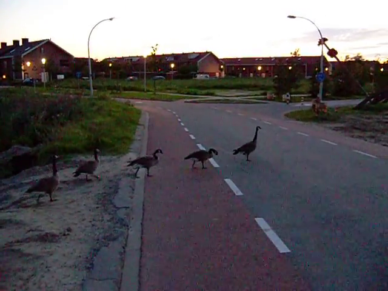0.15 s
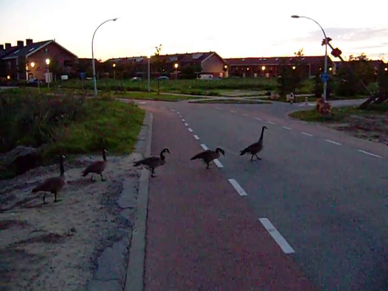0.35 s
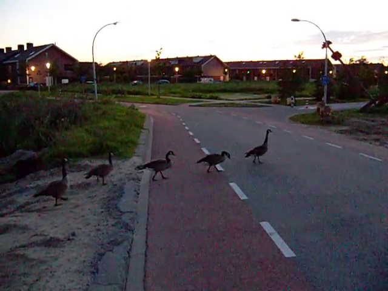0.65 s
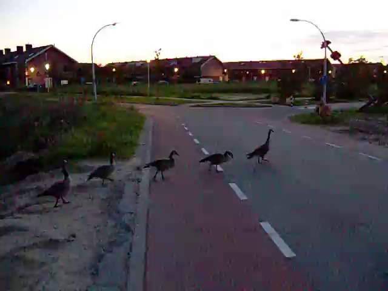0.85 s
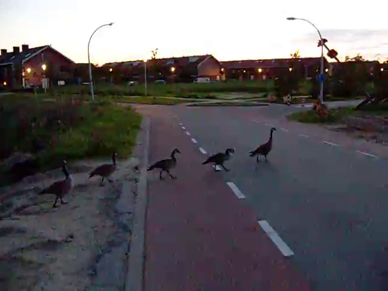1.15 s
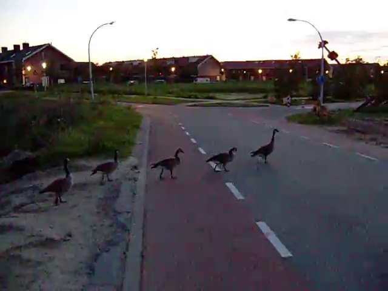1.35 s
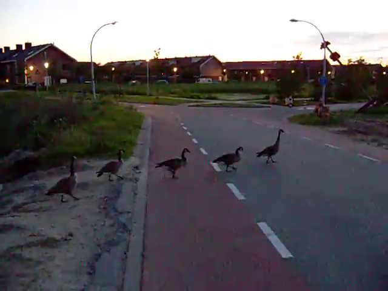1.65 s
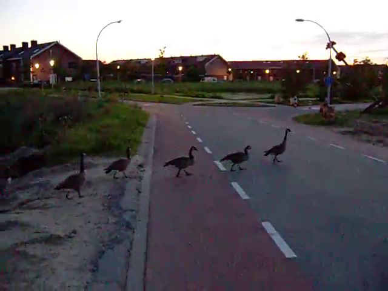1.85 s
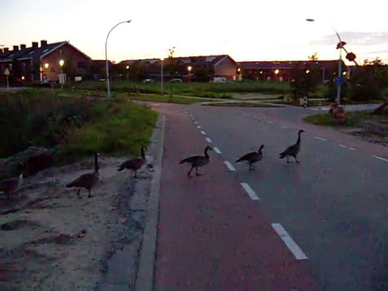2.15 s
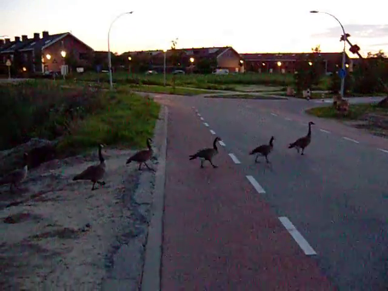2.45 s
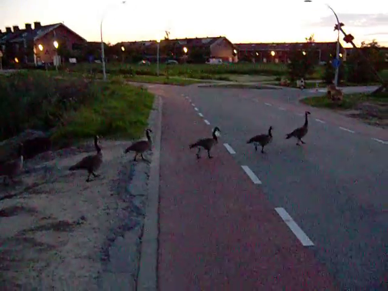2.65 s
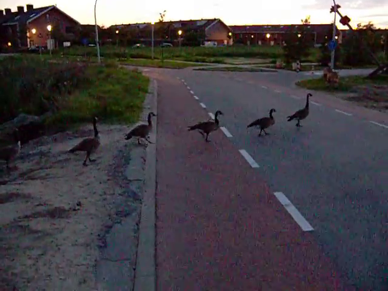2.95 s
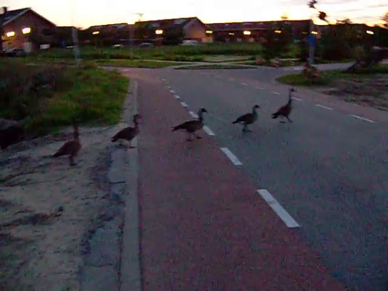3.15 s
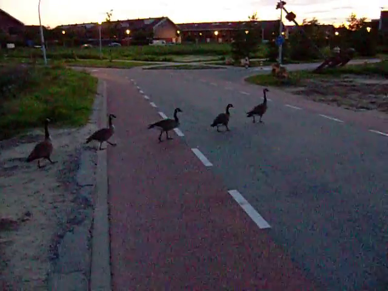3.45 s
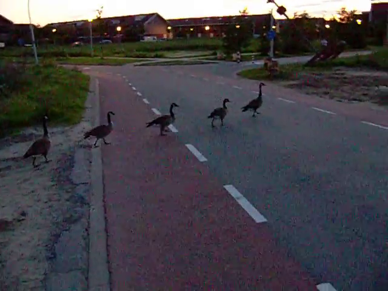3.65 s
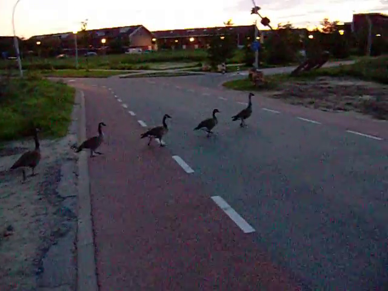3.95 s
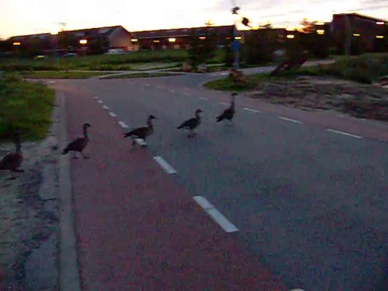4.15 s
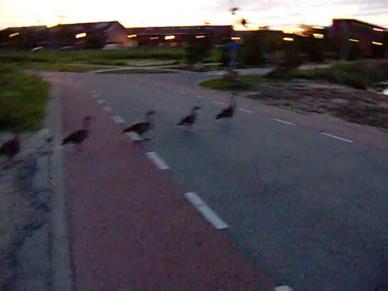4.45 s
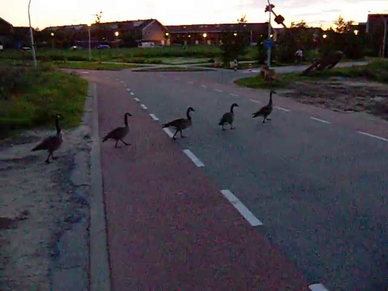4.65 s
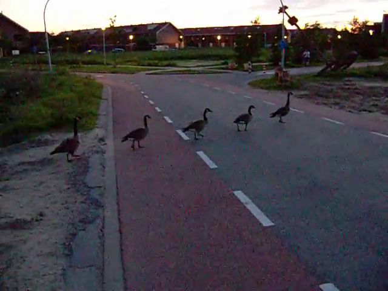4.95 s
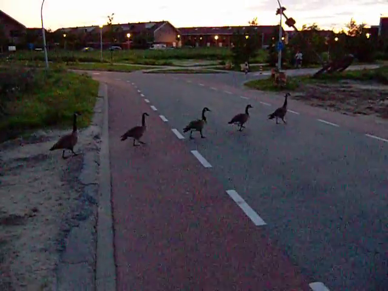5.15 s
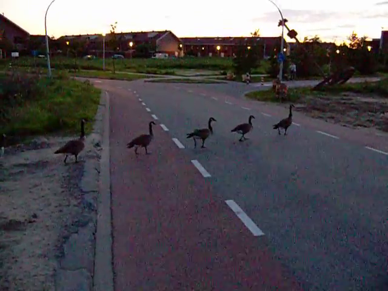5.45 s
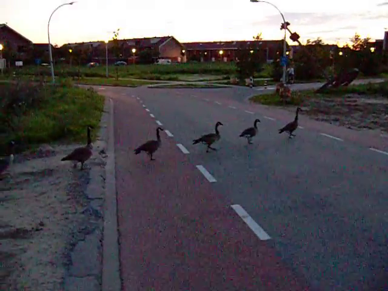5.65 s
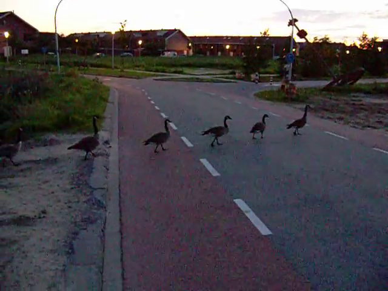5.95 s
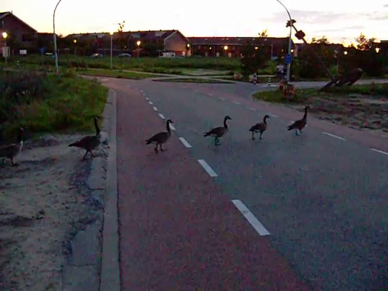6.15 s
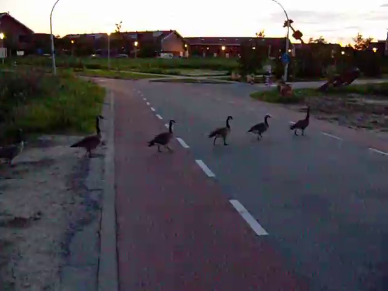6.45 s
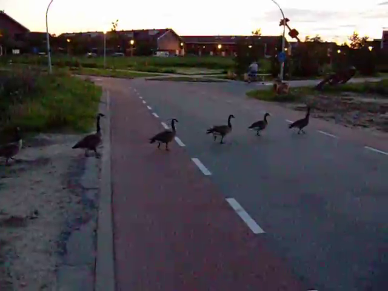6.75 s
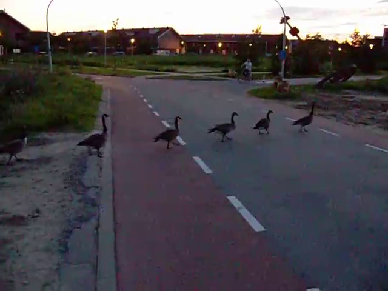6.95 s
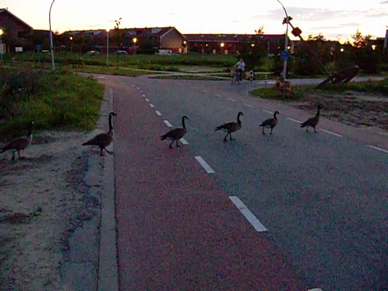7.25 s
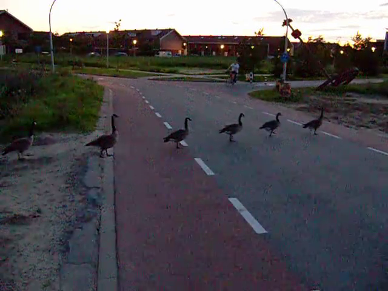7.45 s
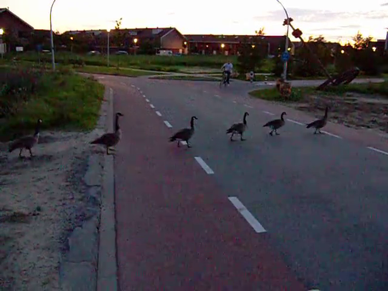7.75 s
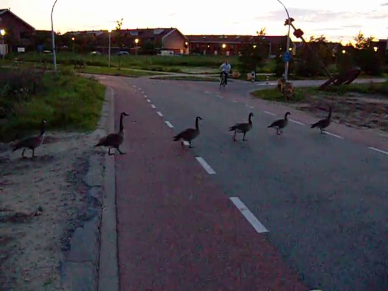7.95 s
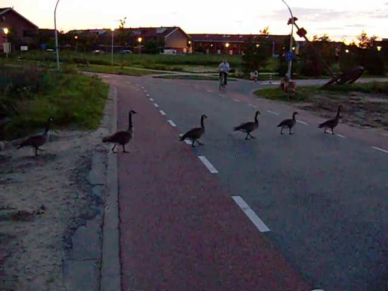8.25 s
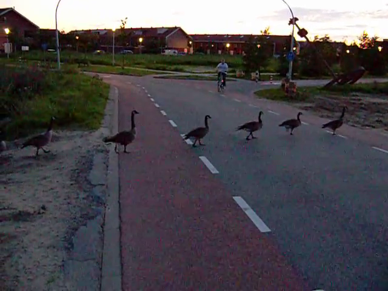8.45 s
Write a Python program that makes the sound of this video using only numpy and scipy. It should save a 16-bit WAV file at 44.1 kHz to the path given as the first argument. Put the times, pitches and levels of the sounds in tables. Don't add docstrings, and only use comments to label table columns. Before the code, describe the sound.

Geese cross a street in the open air, and one calls four times: clipped, clean, piercing yelps with lots of quiet between them. Faint slaps of echo come back from nearby houses. Far traffic makes a constant soft rumble and hush, joined at first by a low engine drone that dies off. Close to the small hand-held microphone are dull finger bumps, mostly mid-way, bright little ticks, slight rustling and a barely audible whine.

```python
import sys
import numpy as np
from scipy import signal
from scipy.fft import rfft, irfft
from scipy.io import wavfile
from scipy.ndimage import uniform_filter1d

SR = 44100
rng = np.random.default_rng(int(sys.argv[2]) if len(sys.argv) > 2 else 0)


def generate_wav(sig):
    pcm = np.round(np.clip(np.atleast_2d(sig).T, -1, 1) * 32767).astype(np.int16)
    wavfile.write(sys.argv[1], SR, pcm)


def magnitude_from_level(level_db):
    exponent = np.asarray(level_db, float) / 20
    return 10 ** exponent


N = 378819


def rms_one(x):
    return x / np.sqrt(np.mean(x ** 2) + 1e-20)


def in_time(rows, t):
    s, *columns = np.transpose(rows)
    return [np.interp(t, s, column) for column in columns]


def at_hz(points, hz):
    point_hz, db = np.array(points).T
    return np.interp(np.log(hz), np.log(point_hz), db)


def drift(rate):
    r = np.exp(-40 * np.pi * rate / SR)
    slow = signal.lfilter([1], [1, -2 * r, r * r], rng.standard_normal(N // 20 + 4002))
    slow = slow[4000:]
    return np.interp(np.arange(N) / 20, np.arange(len(slow)), rms_one(slow))


def resonance(x, hz, width_hz):
    r = np.exp(-np.pi * width_hz / SR)
    poles = [1, -2 * r * np.cos(2 * np.pi * hz / SR), r * r]
    return signal.lfilter([(1 - r * r) / 2, 0, (r * r - 1) / 2], poles, x)


def low_pass(x, order, hz):
    return signal.sosfilt(signal.butter(order, hz, fs=SR, output="sos"), x)


def add(out, s, sound):
    i = round(s * SR)
    out[i:i + len(sound)] += sound


def swells(rows, floor_db, t):
    peaks = [db - 10 * np.where(t < s, (s - t) / rise, (t - s) / fall) for s, db, rise, fall in rows]
    return magnitude_from_level(np.maximum(np.max(peaks, axis=0), floor_db))


# [start t/s, onset f/Hz, top f/Hz, tail f/Hz, share of the fall done at the shoulder]
CALLS = [
    (2.0419, 1590, 1628, 1395, .72),
    (3.6438, 1632, 1725, 1440, .5),
    (5.948, 1650, 1764, 1505, .27),
    (7.8162, 1632, 1768, 1503, 0.47),
]
# [strength level/dB, top level/dB, fall level/dB, voice breaks after t/s, length t/s]
MANNER = [
    (0.5, -4, -9, .0445, 0.055),
    (0, 2, -4, .0445, 0.058),
    (-0.5, -0.5, -7, 0.04, 0.055),
    (-2.5, 3, 6, .042, 0.057),
]
# [half-pitch lines at onset level/dB, beak level/dB, throb level/dB, catch at the fall level/dB]
COLOUR = [
    (-4.5, 6, -2.5, -2),
    (-13, 3.5, -3, -10),
    (-12, 4.5, 0, -6),
    (-11, 11.5, -0.5, -3.5),
]
# [f/Hz, rms of a line level/dB]
THROAT = [(800, -61.5), (1650, -36.5), (2500, -41), (3300, -40.5), (4200, -47), (4800, -36.5),
          (5150, -35.5), (5900, -33.5), (6700, -33), (7300, -28.5), (7700, -35), (8100, -35.5)]
# [f/Hz, dB per dB of effort]
EFFORT_SLOPE = [(800, -0.4), (1650, 0.11), (3300, 0), (5000, 0.76), (6700, 0.57)]
# [f/Hz, dB per dB of catch]
CATCH_SLOPE = [(1650, .5), (3300, .9), (6700, 1.1)]
BEAK_HZ, BEAK_WIDTH_HZ, BEAK_CLICK_DB = 3140, 300, -31
WEAK_DB = -27.5
PITCH_WOBBLE, LINE_WOBBLE_DB, BREATH_DB = .004, 0.4, -21


def bird():
    out, wobble = np.zeros(N), drift(170)
    for call, manner, colour in zip(CALLS, MANNER, COLOUR):
        start, end = call[0], call[0] + manner[-1]
        at = np.arange(round(start * SR), round(end * SR))
        t = at / SR
        pitch, effort, half_db, beak_db, catch_db = call_controls(t, call, manner, colour)
        soft_db = np.minimum(effort - WEAK_DB, 0)
        half_phase = np.pi * np.cumsum(pitch * (1 + PITCH_WOBBLE * wobble[at])) / SR
        edges = np.clip(np.minimum((t - start) / 0.0019, (end - t) / 0.0094), 0, 1)
        for k in range(1, 11):
            hz = k * pitch / 2
            line_db = at_hz(THROAT, hz) + at_hz(EFFORT_SLOPE, hz) * effort
            line_db += (k % 2) * half_db
            line_db += soft_db * (hz > 4000) + at_hz(CATCH_SLOPE, hz) * catch_db
            line_db += beak_db * np.exp(-((hz - BEAK_HZ) / BEAK_WIDTH_HZ) ** 2)
            line_db += LINE_WOBBLE_DB * wobble[at - 1500 * k]
            breath = rms_one(uniform_filter1d(rng.standard_normal(len(t)), size=24))
            level = edges * (1 + magnitude_from_level(BREATH_DB) * breath) * np.sqrt(2) * magnitude_from_level(line_db)
            out[at] += level * np.cos(k * half_phase) * (hz < 8400)
        click = np.diff(rng.standard_normal(201)) * np.exp(-np.arange(200) / 60)
        add(out, start - .001, magnitude_from_level(BEAK_CLICK_DB) * click)
    return out


STAGE_EFFORT = [-13.5, 5, -3.5, -3, -14, -24.5, -42.5, -44]
STAGE_HALF = [-13, -33.5, -35, -30, -27, -25, -22]
# [t/s, length t/s, half-pitch lines level/dB]
DOUBLING = [
    (5.978, 0.0093, 2),
    (5.985, 0.0046, 4.5),
    (6.003, .008, 5),
    (7.87, 0.0089, -5),
]
BURST_S, SETTLED_S, TOP_S, FALLING_S, SHOULDER_S = .003, 0.012, 0.022, .030, 0.0383
ONSET_SHARP, SETTLED_SHARE, FALLING_SHARE, TAIL_SAG = 0.043, .6, 0.28, .005
BEAK_OPENING, BEAK_CLOSED_DB = 0.97, -7.5
FIRST_CATCH_S, FIRST_CATCH_DB, THROB_S, BREAK_CATCH_DB = .0075, -16, .0066, -10
THROB_SAG, THROB_SAG_S = .012, .0028


def call_controls(t, call, manner, colour):
    start, onset, top, tail, shoulder = call
    strength_db, top_db, fall_db, break_s, length = manner
    onset_half_db, beak_db, throb_db, catch_db = colour
    stages = start + np.array([0, BURST_S, SETTLED_S, TOP_S, FALLING_S, SHOULDER_S, break_s, length])
    settled, drop = onset + SETTLED_SHARE * (top - onset), top - tail
    pitch = [onset * (1 + ONSET_SHARP), onset, settled, top,
             top - FALLING_SHARE * drop, top - shoulder * drop, tail, tail * (1 - TAIL_SAG)]
    sag_at = start + FIRST_CATCH_S + 1.6 * THROB_S
    sag = 1 - THROB_SAG * np.exp(-((t - sag_at) / THROB_SAG_S) ** 2)
    held = [0, 0, 0, top_db, (top_db + fall_db) / 2, fall_db, 0, 0]
    effort = strength_db + np.array(STAGE_EFFORT) + held
    half_db = np.interp(t, stages, [STAGE_HALF[0], onset_half_db, *STAGE_HALF[1:]])
    for s, spread, db in DOUBLING:
        half_db = np.maximum(half_db, db - 10 * ((t - s) / spread) ** 2)
    beak = [0, 0, BEAK_OPENING * beak_db, beak_db] + [BEAK_CLOSED_DB] * 4
    catches = [(FIRST_CATCH_S, FIRST_CATCH_DB),
               (FIRST_CATCH_S + THROB_S, throb_db), (FIRST_CATCH_S + 2 * THROB_S, throb_db),
               (FALLING_S, catch_db), (break_s, BREAK_CATCH_DB)]
    caught_db = sum(catch(t - start - s, db) for s, db in catches)
    return (sag * np.interp(t, stages, pitch), np.interp(t, stages, effort), half_db,
            np.interp(t, stages, beak), caught_db)


def catch(t, db):
    closing_s, opening_s, overshoot, settling_s = 0.0017, 0.0011, 0.33, 0.0046
    dip = np.exp(-(t / np.where(t < 0, closing_s, opening_s)) ** 2)
    return db * (dip - overshoot * (1 - dip) * (t > 0) * np.exp(-np.abs(t) / settling_s))


# [delay t/s, level/dB]
ECHOES = [
    (.024, -23),
    (.045, -23),
    (.088, -15),
    (.118, -25),
    (.15, -26),
    (.19, -29),
]
# [f/Hz, width f/Hz, level/dB]
WALLS = [
    (1700, 400, -10),
    (3450, 240, 0),
    (5150, 400, -10),
    (6900, 600, -24),
]
TAIL_DB, TAIL_START_S, TAIL_T60_S = -46, 0.012, .55


def house_fronts(x):
    t = np.arange(SR // 3) / SR
    paths = rng.standard_normal(len(t)) * (t > TAIL_START_S) * magnitude_from_level(TAIL_DB - 60 * t / TAIL_T60_S)
    for delay, db in ECHOES:
        paths[round(delay * SR)] += magnitude_from_level(db)
    late = signal.fftconvolve(x, paths)[:N]
    return sum(magnitude_from_level(db) * resonance(late, hz, width) for hz, width, db in WALLS)


# [t/s, firing f/Hz, rms level/dB]
ENGINE = [
    (0.0, 119.5, -42),
    (0.3, 119.6, -40.5),
    (0.63, 121.5, -45.5),
    (0.8, 122.3, -48.5),
    (1.22, 120.1, -49),
    (2.3, 119.9, -56),
]
ORDER_DB = [0, -15, -12]
ORDER_FADE = [0, 23, 14]


def engine():
    t = np.arange(N) / SR
    hz, level_db = in_time(ENGINE, t)
    phase = 2 * np.pi * np.cumsum(hz) / SR
    gone = np.clip((2.5 - t) / 0.33, 0, 1)
    tones = 0
    for order, (db, fade) in enumerate(zip(ORDER_DB, ORDER_FADE), start=1):
        tones = tones + np.sqrt(2) * magnitude_from_level(level_db + db - fade * t) * np.sin(order * phase)
    return gone * tones


# [t/s, peak level/dB, f/Hz, time to fall 60 dB t/s, push -1 or 1]
KNOCKS = [(.40, -48, 1270, .12, 1), (2.229, -19.5, 1220, 0.0015, -1), (2.229, -28, 332, 0.015, 1),
          (3.7438, -38, 1070, 0.041, 1), (3.745, -36, 480, 0.032, -1), (3.759, -41.5, 1090, 0.097, 1),
          (3.952, -29, 254, 0.035, 1), (3.979, -34, 230, 0.037, 1), (4.2366, -28, 420, 0.014, -1),
          (4.2412, -28, 190, 0.032, -1), (4.4012, -24, 415, 0.0077, -1), (4.405, -45, 298, .03, -1),
          (4.412, -28, 300, 0.0068, -1)]
# [t/s, peak level/dB, centre f/Hz, width f/Hz]
TICKS = [
    (.7604, -43, 6000, 2500),
    (2.2278, -46, 7100, 1187),
    (2.6693, -40, 6500, 2500),
    (3.2387, -37.5, 2630, 1200),
    (4.993, -36, 6400, 3000),
    (5.19, -41, 5530, 3000),
    (5.2394, -40, 6800, 2000),
    (7.6505, -33, 5800, 5000),
    (8.0152, -45, 4000, 1200),
]
# [t/s, peak level/dB, rise by 10 dB t/s, fall by
# 10 dB t/s]
RUSTLE = [(0.0, -67, .01, .06), (.35, -61.5, .08, .8), (1.19, -66, .01, .2), (2.21, -58.5, 0.037, 0.011),
          (2.668, -63, .01, .06), (3.79, -58, .05, .06), (4.87, -65, .5, .08), (4.99, -58.5, .006, 0.1),
          (5.69, -59.5, .008, 0.23), (7.444, -64, .025, .2), (7.9, -64, .2, 0.18)]
RUSTLE_FLOOR_DB, CASE_CUT_HZ = -73, 2600
TICK_T60_S, CONTACT_CYCLES = 0.0071, 0.094


def camera():
    t = np.arange(N) / SR
    cloth = resonance(resonance(rng.standard_normal(N), 6700, 2400), 6700, 2400)
    out = swells(RUSTLE, RUSTLE_FLOOR_DB, t) * rms_one(cloth)
    short = t[:SR // 8]
    for s, db, hz, t60, push in KNOCKS:
        soft = (1 - np.exp(-short * hz / CONTACT_CYCLES)) ** 2
        knock = np.sign(push) * soft * magnitude_from_level(db - 60 * short / t60) * np.sin(2 * np.pi * hz * short)
        add(out, s, low_pass(knock, 2, CASE_CUT_HZ))
    for s, db, hz, width_hz in TICKS:
        burst = rng.standard_normal(len(short)) * magnitude_from_level(-60 * short / TICK_T60_S)
        burst = resonance(burst, hz, width_hz)
        add(out, s, magnitude_from_level(db) * burst / np.abs(burst).max())
    return out


# [multiple of the whine, level/dB, wavering level/dB]
WHINES = [(1, -69, 0), (2, -69, 1), (4, -81, 0.8), (5, -73.5, 2.5), (6, -78.5, 1.7), (7, -81, 0.3),
          (8, -71, 0.3)]
# [f/Hz, level/dB]
SIDE_WHINES = [(7852, -83), (7882, -81)]
# [t/s, peak level/dB, rise t/s, fall t/s]
WHISTLE = [
    (1.2, -67.5, .2, .6),
    (1.87, -66.5, 1.7, 1.2),
    (3.69, -66, .7, 1.2),
    (5.7, -71, 1.5, .2),
    (6.41, -69, 0.17, 1.1),
]
WHINE_HZ, WHISTLE_HZ, WHISTLE_DRIFT_HZ, WHISTLE_FLOOR_DB = 960.9, 2656, 3, -81


def whines():
    t = np.arange(N) / SR
    out = sum(magnitude_from_level(db + waver_db * drift(6)) * np.sin(2 * np.pi * round(k) * WHINE_HZ * t)
              for k, db, waver_db in WHINES)
    out += sum(magnitude_from_level(db) * np.sin(2 * np.pi * hz * t) for hz, db in SIDE_WHINES)
    level = swells(WHISTLE, WHISTLE_FLOOR_DB, t) * magnitude_from_level(1.1 * drift(9))
    hz = WHISTLE_HZ + WHISTLE_DRIFT_HZ * drift(1.5)
    return np.sqrt(2) * (out + level * np.sin(2 * np.pi * np.cumsum(hz) / SR))


# [t/s, level/dB]
HUSH = [(0.0, -47.5), (1.1, -46), (2.4, -44.5), (3.0, -46.5), (3.37, -42), (3.7, -46), (4.57, -45),
        (5.0, -44.5), (6.2, -46.5), (6.74, -45.5), (8.59, -49)]
# [f/Hz, level/dB]
RUMBLE = [(8.8, -46.5), (15, -9), (64, 1.5), (102, 1.5), (140, -11), (260, -14.5), (340, -24.5),
          (570, -120)]
# [f/Hz, level/dB]
HISS = [(88, -26), (150, 0), (216, -8.5), (362, -6), (414, -8), (983, -13), (1700, -17.5), (1980, -18),
        (2370, -20), (2580, -19.5), (3420, -21.5), (7480, -26.5), (8000, -28.5), (10400, -65.5),
        (17600, -120)]
HISS_DB, HISS_FOLLOWS, HISS_EARLY_DB, HISS_SETTLES_S = -50.5, .03, 2.5, 1.5


def street():
    t = np.arange(N) / SR
    rumble_db, = in_time(HUSH, t)
    hiss_db = HISS_DB + HISS_FOLLOWS * (rumble_db - rumble_db.mean())
    hiss_db += HISS_EARLY_DB * np.exp(-t / HISS_SETTLES_S)
    rumble = magnitude_from_level(rumble_db) * banded_noise(RUMBLE, patchy_db=0.14)
    return rumble + magnitude_from_level(hiss_db) * banded_noise(HISS, patchy_db=0.72)


def banded_noise(spectrum, patchy_db):
    hz = np.maximum(np.fft.rfftfreq(N, 1 / SR), 1)
    coloured = rfft(rng.standard_normal(N)) * magnitude_from_level(at_hz(spectrum, hz))
    band = np.floor(1.5 * np.log2(np.clip(hz, spectrum[0][0], spectrum[-1][0])))
    together = drift(0.6)
    out = np.zeros(N)
    for b in np.unique(band):
        flicker = magnitude_from_level(patchy_db * (0.74 * together + drift(13)))
        out += irfft(coloured * (band == b), N) * flicker
    return rms_one(out)


def scene():
    voice = bird()
    return (voice + house_fronts(voice) + engine() + camera() + whines() + street())[None]


def top_cut(x):
    return signal.sosfilt(signal.butter(12, 9300, fs=SR, output="sos"), x)


SAMPLING_HZ, EDGE_HZ = 16000, 7635
IMAGE_DB, IMAGE_HZ, CUTOFF_HZ = 0, 8420, 8120


def record(dry):
    kept = low_pass(dry, 24, EDGE_HZ)
    mirrored = 2 * kept * np.cos(2 * np.pi * SAMPLING_HZ * np.arange(N) / SR)
    image = low_pass(mirrored, 10, IMAGE_HZ)
    both = low_pass(kept + magnitude_from_level(IMAGE_DB) * image, 24, CUTOFF_HZ)
    return top_cut(both)


dry = scene()
out = record(dry)
generate_wav(out)
```